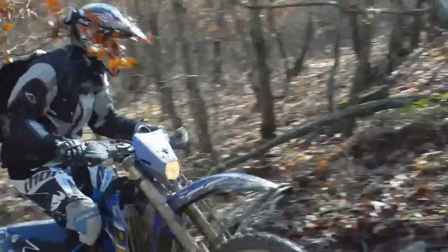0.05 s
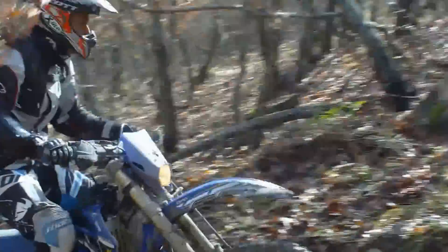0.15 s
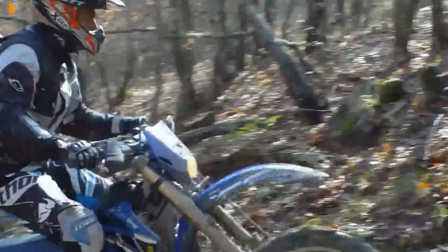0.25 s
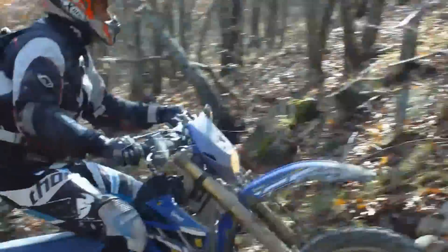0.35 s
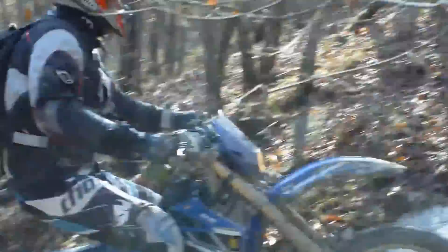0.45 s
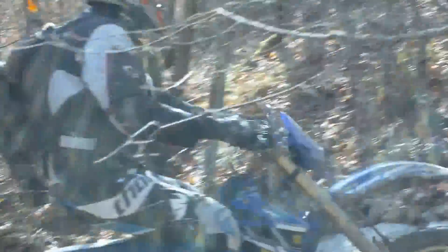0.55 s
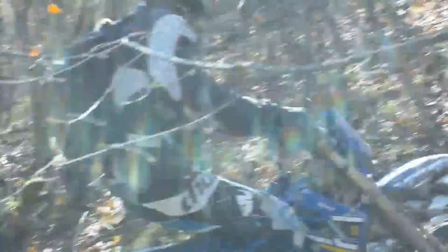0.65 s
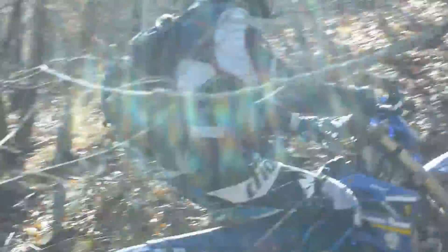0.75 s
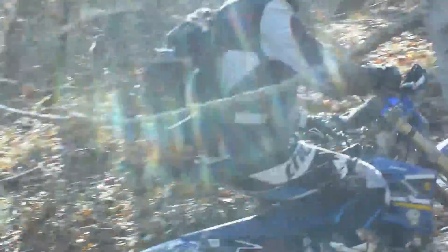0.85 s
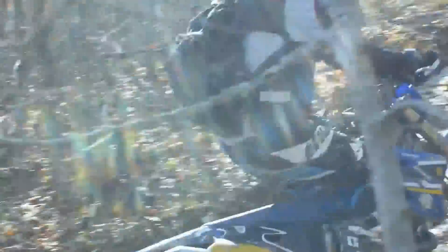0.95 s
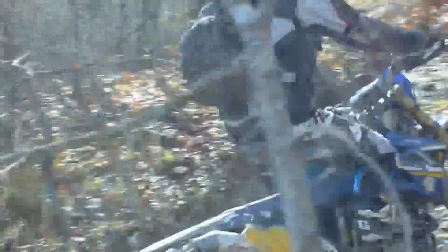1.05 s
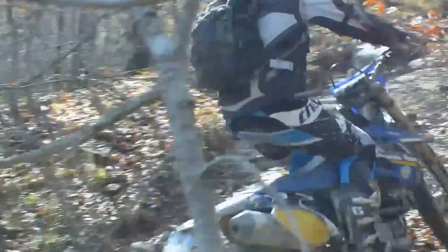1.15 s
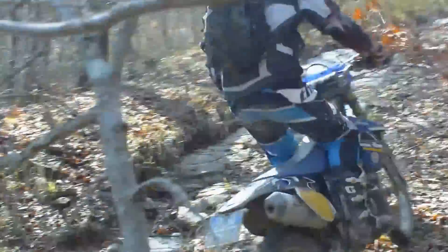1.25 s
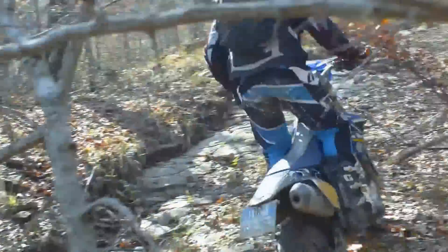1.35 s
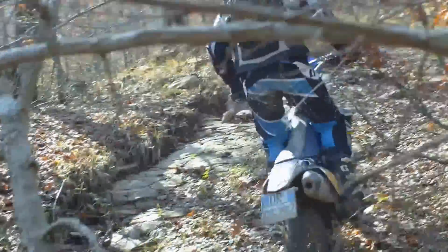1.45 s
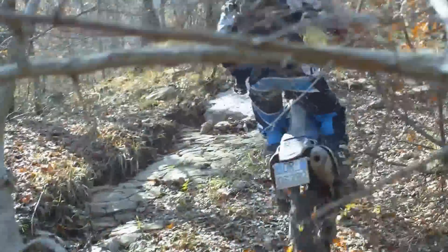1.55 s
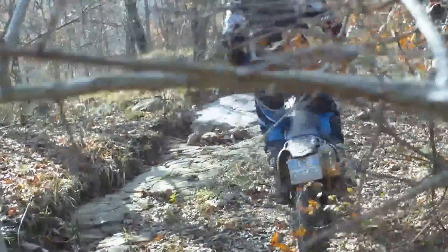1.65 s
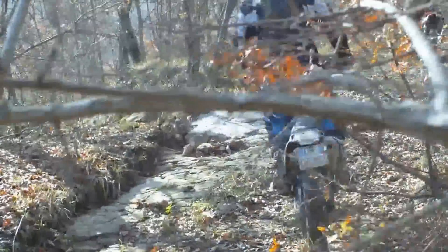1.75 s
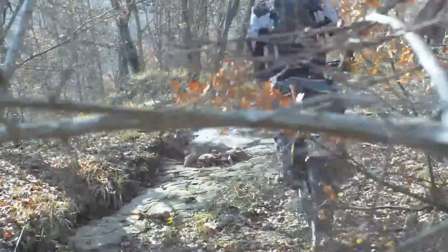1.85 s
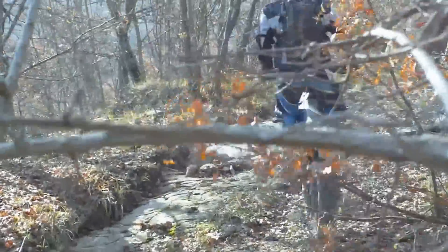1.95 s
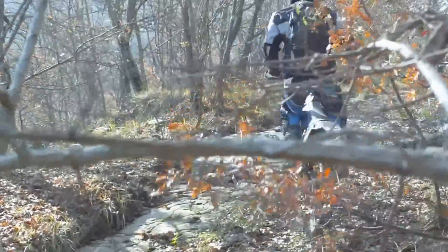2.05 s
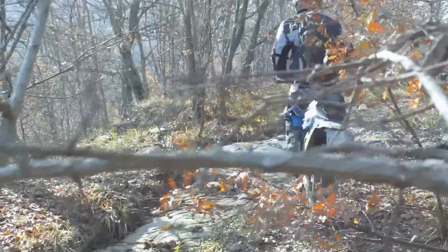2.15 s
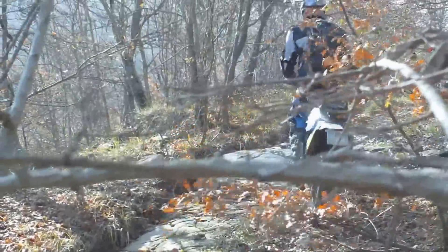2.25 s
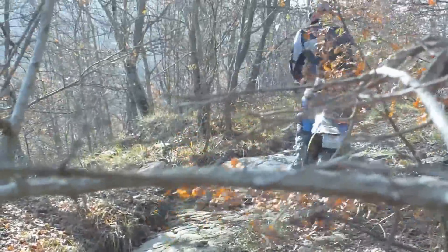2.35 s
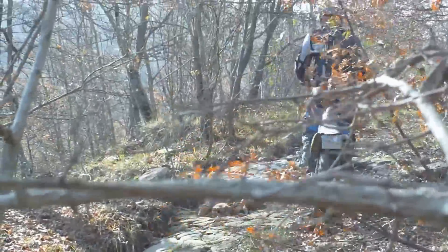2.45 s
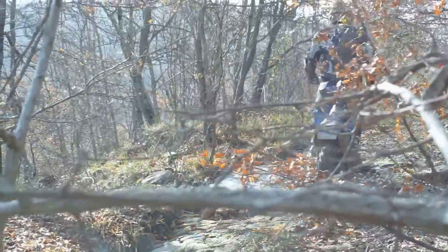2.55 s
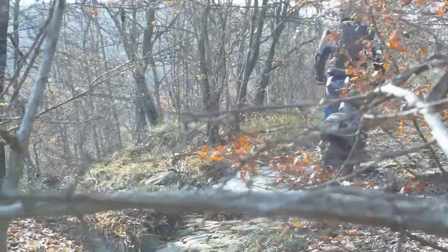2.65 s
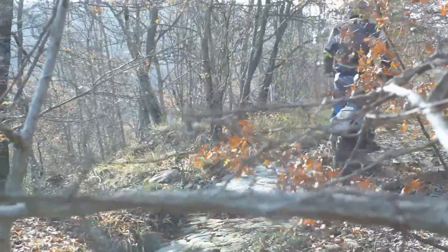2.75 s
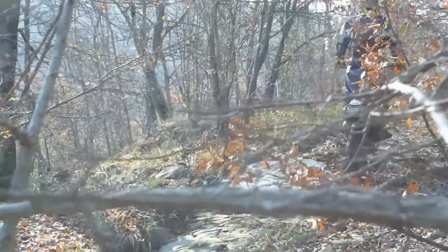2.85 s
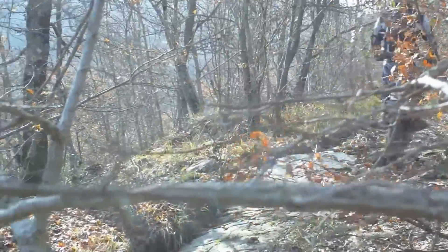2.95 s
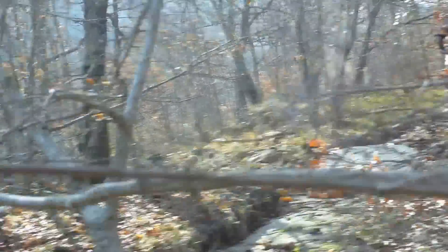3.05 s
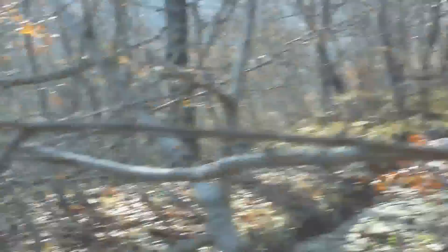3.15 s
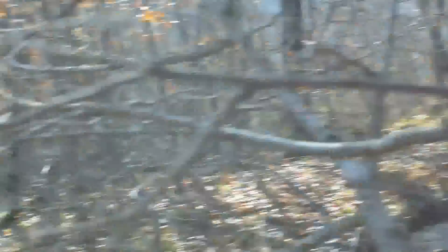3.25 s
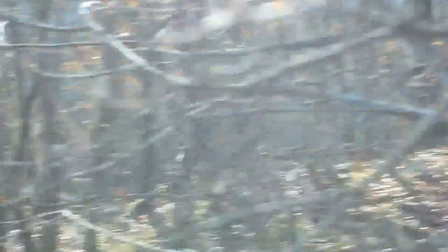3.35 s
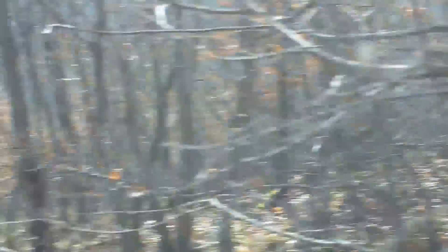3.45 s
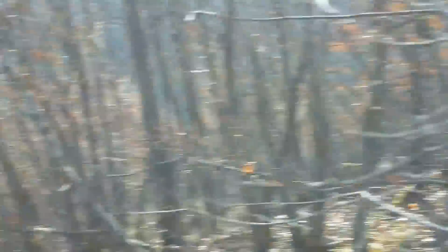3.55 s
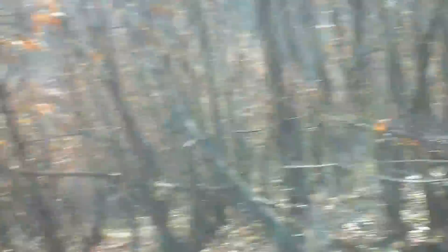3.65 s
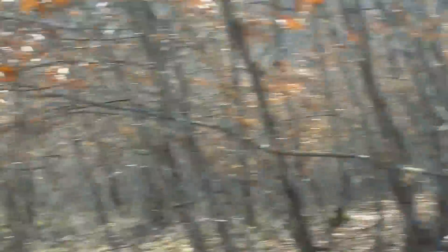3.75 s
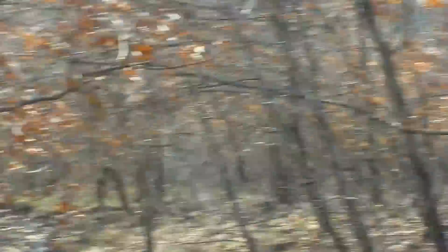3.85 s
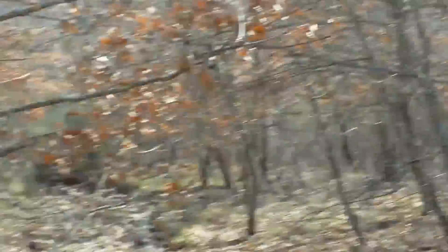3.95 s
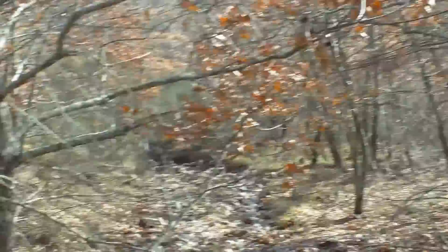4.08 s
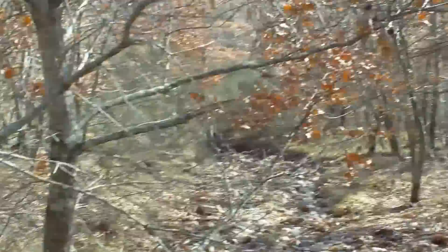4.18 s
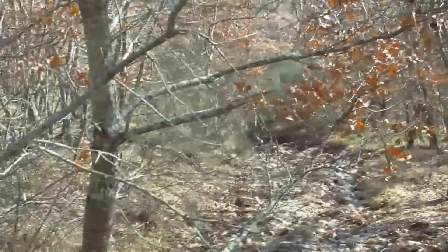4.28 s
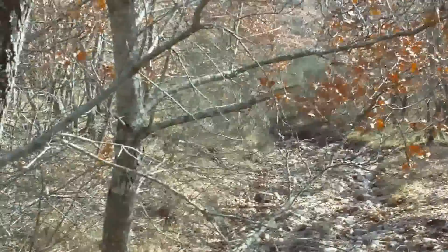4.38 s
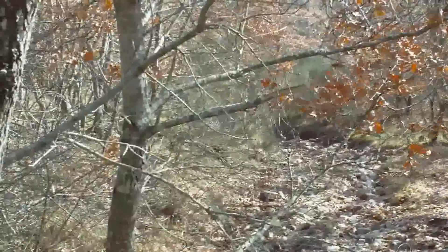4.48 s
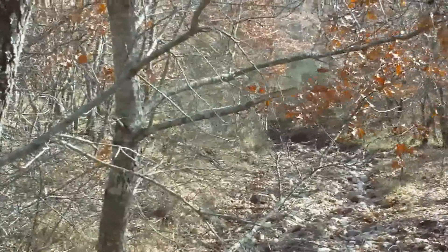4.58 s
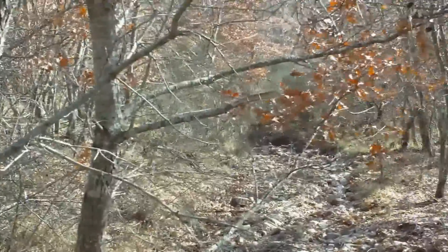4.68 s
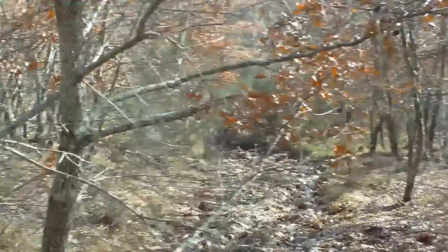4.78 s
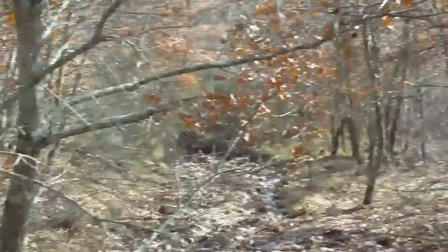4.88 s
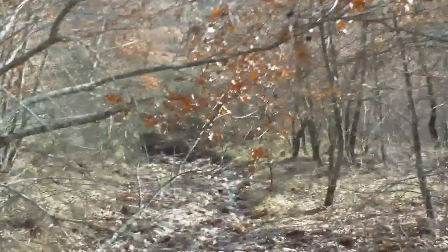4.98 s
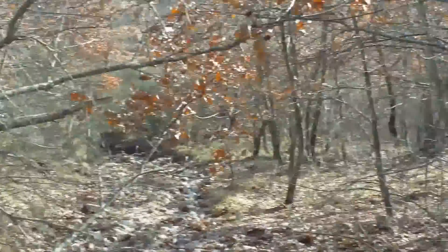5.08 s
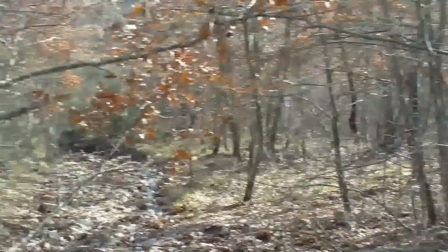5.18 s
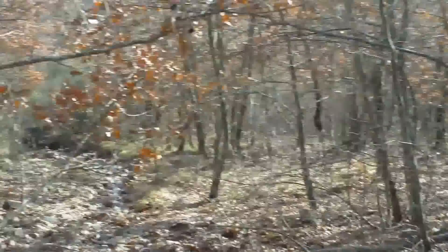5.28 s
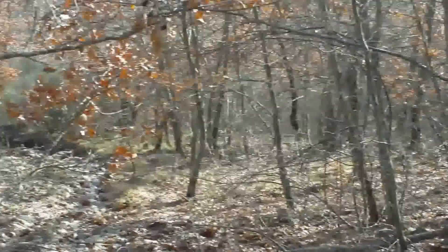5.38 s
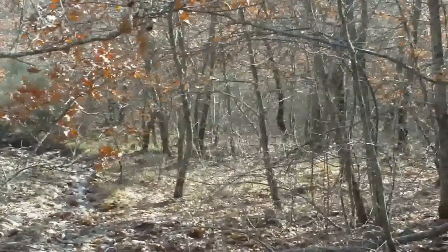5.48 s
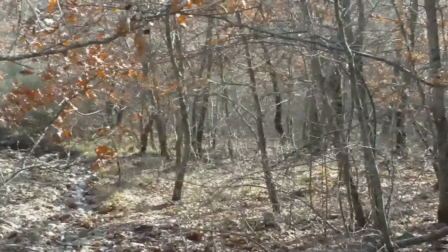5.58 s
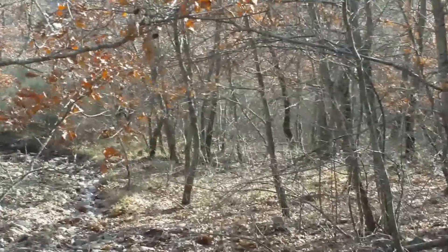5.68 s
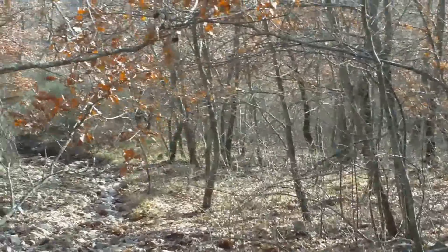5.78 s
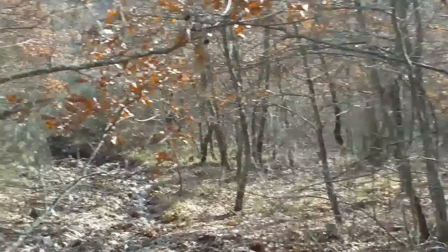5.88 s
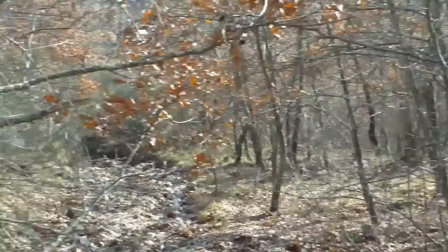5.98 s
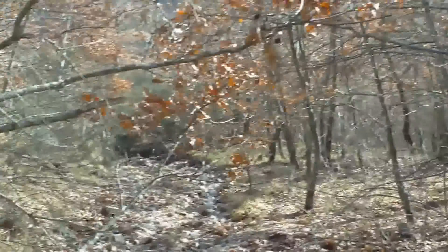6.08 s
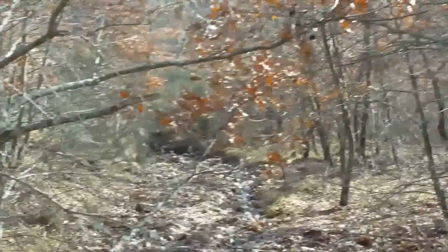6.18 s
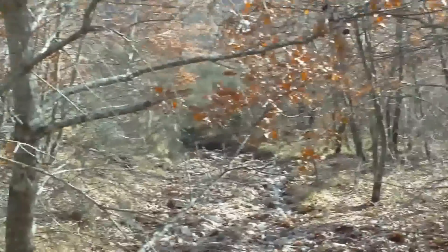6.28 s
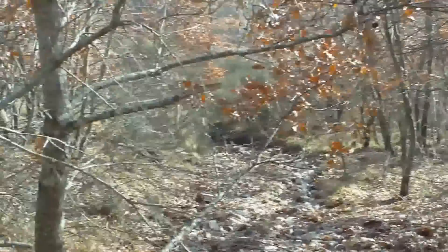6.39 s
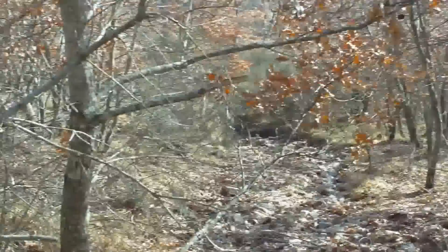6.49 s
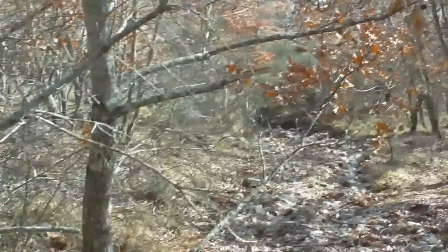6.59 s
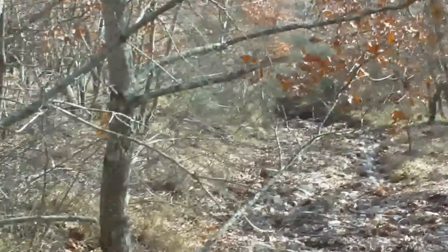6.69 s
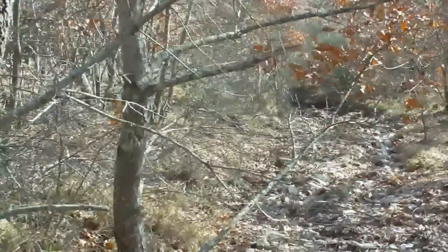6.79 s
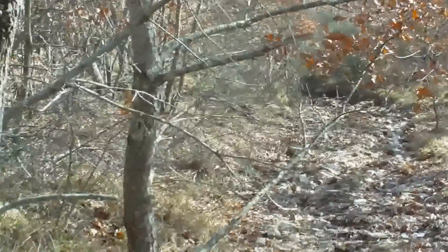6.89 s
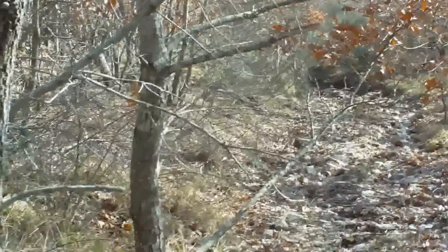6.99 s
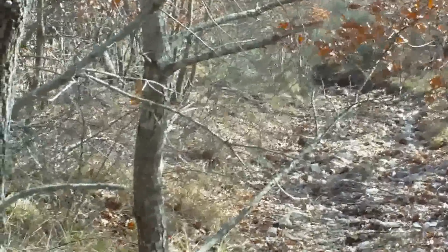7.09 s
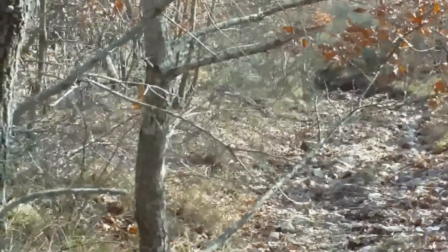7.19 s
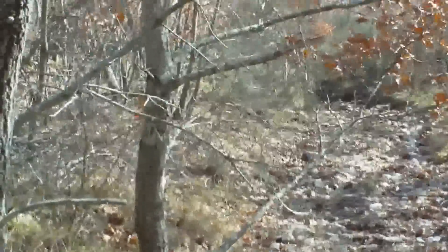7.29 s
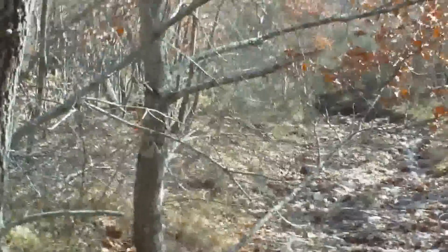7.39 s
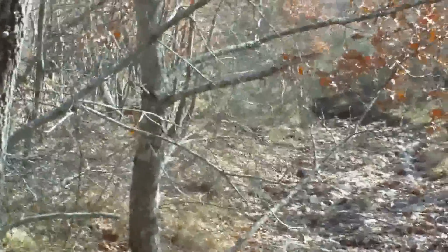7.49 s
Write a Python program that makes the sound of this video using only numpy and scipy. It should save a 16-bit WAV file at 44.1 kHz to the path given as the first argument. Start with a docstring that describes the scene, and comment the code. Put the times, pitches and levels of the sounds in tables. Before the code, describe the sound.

A four-stroke dirt bike passes very close in a leafless wood, its blunt, raspy exhaust revving hard over mechanical clatter. It rides away in uneven throttle bursts, dropping sharply after about three and a half seconds to a faint, slow idle. Near the small, dull-topped handheld microphone, dry leaves crackle, twigs tick and one loud knock lands near the end.

```python
"""A single-cylinder four-stroke trail bike rides past in a leafless wood, climbs away in bursts of throttle
and idles far off; near the microphone twigs snap and dry leaves rustle.
Every firing is a blunt pulse and a puff of turbulent gas ringing the exhaust, over steady clatter.
Trunks scatter the bike's sound as a noise tail; leaves are crackles on hiss, snaps are short rung bursts."""
import sys
import numpy as np
from scipy import signal
from scipy.fft import rfft, irfft, next_fast_len
from scipy.io import wavfile
from scipy.ndimage import uniform_filter1d

SR = 44100
rng = np.random.default_rng(int(sys.argv[2]) if len(sys.argv) > 2 else 0)


def digitize_waveform(pressure):
    """Quantize a signal to 16-bit integers and store it at the path in sys.argv[1].

    Rows of a 2-D input are taken as channels; values are limited to [-1, 1].
    """
    field = np.atleast_2d(pressure).T
    bounded = np.clip(field, -1, 1)
    quanta = np.round(bounded * 32767).astype(np.int16)
    wavfile.write(sys.argv[1], SR, quanta)


N = 332073

PULSE_SAMPLES = 4096
HZ = np.arange(PULSE_SAMPLES // 2 + 1) * SR / PULSE_SAMPLES + 1e-3   # offset avoids division by zero
PIPE_ECHO_S = .0092   # the pulse runs back up the pipe and leaves again

# exhaust resonances: (centre [Hz], width [Hz], level [dB])
RASP_MODES = [(1982, 155, 11.2), (2450, 195, 5.1), (2980, 500, 0.37)]
HISS_MODES = [(3440, 580, -5.5), (4700, 630, -9.5), (5395, 420, -10), (6660, 960, -15)]


def amp(db):
    """Decibels to gain."""
    return 10 ** (np.asarray(db) / 20)


def rms_one(x):
    """Scaled to unit rms."""
    return x / np.sqrt(np.mean(x ** 2) + 1e-20)


def columns(rows, s):
    """Table columns interpolated at times s; the first column is time."""
    when, *cols = np.transpose(rows)
    return [np.interp(s, when, c) for c in cols]


def coloured(x, spectrum):
    """Shapes white input with rows (frequency [Hz], level [dB]); rms 1."""
    hz, db = np.transpose(spectrum)
    size = next_fast_len(N)
    log_hz = np.log(np.arange(size // 2 + 1) * SR / size + 1)
    gain = amp(np.interp(log_hz, np.log(hz), db))
    return rms_one(irfft(rfft(x, size) * gain, size)[:N])


def drift(knots_per_s):
    """Random wander: straight lines between normal knots of spread 1."""
    knots = rng.standard_normal(int(N / SR * 60) + 2)
    return np.interp(np.arange(N) / SR * min(knots_per_s, 60), np.arange(len(knots)), knots)


def resonance(hz, width_hz):
    """Causal band-pass response, one row per entry of hz."""
    hz = np.reshape(hz, (-1, 1))
    return 1 / (1 + 1j * (HZ ** 2 - hz ** 2) / (HZ * width_hz))


def modes(table, count, spread_db, shift=1):
    """Parallel resonances of alternating sign, slightly different for each pulse."""
    luck = rng.standard_normal((count, len(table), 2))
    detune = 1 + .03 * luck[:, :, 1]
    total = 0
    for k, (hz, width_hz, db) in enumerate(table):
        gain = amp(db + spread_db * luck[:, k, :1])
        total = total + (-1) ** k * gain * resonance(hz * shift * detune[:, k], width_hz)
    return total


def blasts(count, rough, rise_s, fall_s):
    """Spectra of gas pulses: a sharp front plus a puff of turbulence that swells and dies."""
    s = np.arange(PULSE_SAMPLES) / SR
    gate = (1 - np.exp(-s / rise_s)) * np.exp(-(s / fall_s) ** 2)
    puff = rng.standard_normal((count, PULSE_SAMPLES)) * gate / np.linalg.norm(gate)
    rough = np.clip(rough, 0, 1)   # the puff's share of the energy
    front = np.exp(-2j * np.pi * HZ * rise_s)
    return np.sqrt(1 - rough) * front + np.sqrt(rough) * rfft(puff)


def lay(spectra, s, gain, peak=False):
    """Pulses scaled to unit energy (or unit peak), then by gain, placed at times s."""
    pulses = irfft(spectra, PULSE_SAMPLES)
    size = np.abs(pulses).max(axis=1) if peak else np.linalg.norm(pulses, axis=1)
    half = PULSE_SAMPLES // 2
    starts = np.round(np.asarray(s) * SR).astype(int) + half
    out = np.zeros(N + 2 * PULSE_SAMPLES)
    for pulse, start, g in zip(pulses, starts, gain / size):
        out[start:start + PULSE_SAMPLES] += g * pulse
    return out[half:half + N]


def through(response):
    """Steady noise heard through the mean magnitude of a response; rms 1."""
    db = 20 * np.log10(np.abs(response).mean(axis=0) + 1e-9)
    return coloured(rng.standard_normal(N), np.c_[HZ, db])


def air():
    """Steady background noise with a fixed spectrum."""
    # (frequency [Hz], level before scaling to rms 1 [dB])
    air_spectrum = [(12, -56.5), (25, -18), (138, 4), (330, 1.5), (560, 8), (900, 3.5), (1680, -22.5),
                    (2680, -31), (6700, -19), (7400, -37.5), (9620, -51.5)]
    return amp(-55) * coloured(rng.standard_normal(N), air_spectrum)


def crank(t):
    """Integrates crank speed to a cycle count; one firing per whole cycle."""
    # (time [s], rate [firings/s])
    firing_rate = [(0.0, 32.97), (0.15, 32.22), (0.27, 39.22), (0.5, 36.74), (0.6, 44.28), (0.72, 30.26),
                   (0.84, 31.11), (0.97, 25.53), (1.1, 31.88), (1.2, 32.1), (1.42, 32.82), (1.5, 40.69),
                   (1.62, 41.58), (1.7, 36.3), (1.82, 37.46), (1.92, 34.19), (2.1, 36.7), (2.2, 31.82),
                   (2.35, 25.17), (2.47, 27.85), (2.6, 32.37), (2.8, 33.49), (3.04, 30.88), (3.15, 33.28),
                   (3.35, 29.58), (3.6, 21.3), (3.78, 30.44), (3.9, 27.06), (4.05, 27.71), (4.19, 24.23),
                   (4.3, 30.46), (4.46, 29.93), (4.62, 35.09), (4.85, 20.86), (4.96, 23.37), (5.14, 18.24),
                   (5.3, 30.47), (5.4, 27.74), (5.53, 24.39), (5.7, 20.24), (5.9, 17.96), (6.1, 15.27),
                   (6.55, 14.83), (6.95, 15.19), (7.2, 13.43), (7.53, 18.35)]
    first_firing_cycles = .079
    blowdown_lead_s = .004   # the valve opens ahead of the loudest moment
    rate, = columns(firing_rate, t)
    cycle = np.cumsum(rate) / SR - first_firing_cycles
    count = int(cycle[-1]) + 1
    s = np.interp(np.arange(count), cycle, t) - blowdown_lead_s
    return cycle, s, np.interp(s, t, rate)


def throttle_and_pass(t):
    """Mean band levels, quick throttle swing, clatter offset and bark centre as the bike moves."""
    # throttle as heard: (time [s], bark [dB], boom [dB re mean bark])
    throttle = [(0.0, -25, -15.5), (0.11, -27, -14), (0.22, -22, -7.5), (0.44, -24, -3), (0.55, -24, -1.5),
                (0.62, -24, -9), (0.67, -24.5, -12), (0.74, -29, -8), (0.79, -27, 3.5), (0.85, -25, -9.5),
                (0.9, -29, -13), (0.97, -32, -15), (1.02, -27.5, -7), (1.1, -21, -8), (1.32, -20.5, -6),
                (1.43, -22.5, -2), (1.54, -22.5, -3.5), (1.65, -23.5, -4.5), (1.76, -17.5, -8.5),
                (2.09, -24.5, -5.5), (2.2, -30.5, -25), (2.42, -34, -13.5), (2.6, -25, -13),
                (2.75, -23.5, -16), (3.08, -27.5, -11.5), (3.3, -31.5, -7.5), (3.52, -46.5, -11),
                (3.65, -47.5, -1), (3.75, -27, -2.5), (3.85, -43, -4), (3.96, -43, 2), (4.2, -50.5, 4),
                (4.27, -54.5, 0), (4.42, -54, -3), (4.47, -49, 8), (4.54, -39, -7), (4.65, -47.5, -5),
                (4.84, -51, 1), (4.97, -54, -17), (5.12, -53, 0), (5.19, -39, -1.5), (5.39, -39.5, -3.5),
                (5.5, -49, -2.5), (5.7, -58, -6), (6.0, -65.5, 1), (6.3, -65.5, -1), (6.7, -63.5, 0.5),
                (7.0, -62.5, -13), (7.3, -60, -11)]
    # colour as the bike passes, turns its tailpipe and recedes:
    # (time [s], thump, upper bark, rasp, hiss [dB re mean bark], bark centre [Hz], clatter offset [dB])
    colour = [(0.0, -18.5, -2.5, -15, -20.5, 756.5, 5), (0.25, -17, -6, -15.5, -23.5, 809, 7),
              (0.45, -13.5, -1, -13.5, -22, 751, 4), (0.6, -24, -4, -12.5, -22, 783.5, 7.5),
              (0.95, -20, -3, -16, -24.5, 782.5, 10), (1.25, -20, -3.5, -10.5, -13, 888, -3.5),
              (1.6, -17.5, -4, -11.5, -15.5, 854.5, -6), (1.85, -18, -8, -12, -21, 698, -5.5),
              (2.1, -12.5, -4, -12.5, -21, 630.5, 1.5), (2.4, -11, -5, -14, -25, 778.5, 3),
              (2.65, -14, -5.5, -15, -24.5, 790.5, -0.5), (3.0, -16.5, -8, -14, -24.5, 811, -1),
              (3.35, -9.5, 1, -10, -19.5, 804.5, 1), (3.55, -15, -5, -13, -21.5, 953, 11.5),
              (3.75, -6.5, -3, -6, -18, 903.5, -1), (4.05, -3, -2, -3.5, -19, 850.5, 8.5),
              (4.35, -5.5, -8, -7.5, -22, 828, 14.5), (4.65, -6, 0.5, 0, -17.5, 904, 7.5),
              (5.0, -12, -6.5, -7.5, -16, 856.5, 7), (5.3, -8.5, -2.5, -2.5, -17.5, 837.5, 1),
              (5.65, -6.5, -6.5, -0.5, -15.5, 799.5, 10), (5.9, 1, 3.5, 5.5, -8, 783, 5.5),
              (6.2, 3, 4, 4.5, -5, 746.5, 7.5), (6.8, 2.5, -2, -2, -10, 745.5, 5.5),
              (7.3, -4, -2, -7, -14, 738, 9)]
    mean_over_s = .3
    bark_db, boom_db = columns(throttle, t)
    thump_db, upper_db, rasp_db, hiss_db, bark_hz, clatter_db = columns(colour, t)
    mean_db = uniform_filter1d(bark_db, size=int(mean_over_s * SR), mode="nearest")
    band_db = [mean_db + db for db in (thump_db, boom_db, 0, upper_db, rasp_db, hiss_db)]
    return band_db, bark_db - mean_db, clatter_db, bark_hz


def gas_pulses(count, overrun, late):
    """Low bands repeat almost cleanly; higher up turbulence takes over and a weak pipe echo follows."""
    echo = 1 + amp(-10) * late
    clean = blasts(count=count, rough=.03 + .35 * overrun[:, None], rise_s=.002, fall_s=.01)
    bark = blasts(count=count, rough=.55, rise_s=.003, fall_s=.007)
    upper = blasts(count=count, rough=.8, rise_s=.003, fall_s=.006) * echo
    rasp = blasts(count=count, rough=.97, rise_s=.003, fall_s=.008) * echo
    hiss = blasts(count=count, rough=1, rise_s=.003, fall_s=.012)
    return [clean, clean, bark, upper, rasp, hiss]


def exhaust_bands(s, bark_hz, late):
    """Pipe resonances in six bands; further resonances in series steepen the bands."""
    # low modes glide with heat and aspect: (time [s], thump [Hz], boom [Hz], third mode [dB re boom])
    low_modes = [(0, 156, 304, -1.5), (.15, 178.5, 320, 3.5), (.3, 207, 380, 8), (.47, 205, 370, 0.5),
                 (.6, 170, 383, -16.5), (.7, 144.7, 340, -3), (.8, 145.6, 317, -22), (.95, 142, 345, -4),
                 (1.05, 143, 309, -6.5), (1.15, 185, 373, -9), (1.4, 171.5, 367, -17),
                 (1.55, 189.4, 357, -5.5), (1.8, 177, 369, -4.5), (2.1, 180, 368, 0.5), (2.3, 150, 390, 6),
                 (2.45, 150, 319, 1), (2.6, 173, 330, 2.5), (2.8, 182, 347, -15), (3.05, 156, 319, -13.5),
                 (3.17, 179, 344, -8), (3.35, 160, 313, -10.5), (3.6, 133, 340, -10.5),
                 (3.76, 159.6, 341, -16), (4.0, 150, 334, -11.5), (4.2, 148, 360, -9.5),
                 (4.5, 163, 371, 0.5), (5.1, 139.4, 337, 3.5), (5.3, 157.3, 321, -5.5), (5.7, 142, 328, -2),
                 (7.3, 132.7, 293, 4.5)]
    # (centre before sliding [Hz], width [Hz], level [dB])
    upper_bark_modes = [(1100, 280, -3.5), (1750, 93, -15)]
    # slides as the tailpipe turns: (time [s], centre of the main upper bark mode [Hz])
    upper_bark_glide = [(0, 1217), (.36, 1095), (.5, 1143), (.66, 1400), (.9, 1242), (1.3, 1216),
                        (1.6, 1127), (2.0, 1153), (2.45, 1500), (2.9, 1310), (3.3, 1086), (3.75, 1257),
                        (4.2, 1100), (4.6, 1143), (5.3, 1090), (7.3, 1070)]
    # one rasp resonance stands out more or less as the tailpipe turns: (time [s], level [dB])
    rasp_peak = [(0, -2.5), (2, -28), (3.5, -37), (4.2, 1), (4.6, -26), (5.2, 4.5), (5.6, 14.5),
                 (6.25, 23.5)]
    count = len(s)

    thump_hz, boom_hz, third_db = columns(low_modes, s)
    thump = resonance(thump_hz, 92) ** 3 - amp(-19.0) * resonance(66, 27)
    third = amp(third_db)[:, None] * resonance(565, 90) * resonance(499, 140)
    boom = resonance(boom_hz, 85) * resonance(boom_hz, 100) * resonance(boom_hz, 220) - third

    # the returning bark is lower
    bark_echo = amp(-4.5) * late * resonance(.82 * bark_hz, 260) ** 2
    bark = resonance(bark_hz, 380) * resonance(bark_hz, 490) - amp(-11.5) * resonance(592, 160) + bark_echo
    bark = bark * resonance(780, 650)

    shift = columns(upper_bark_glide, s)[0] / upper_bark_modes[0][0]
    upper = modes(upper_bark_modes, count=count, spread_db=3.5, shift=shift) * resonance(1350, 900)

    peak = 1 + amp(columns(rasp_peak, s)[0])[:, None] * resonance(2810, 480)
    rasp = modes(RASP_MODES, count=count, spread_db=2.1) * resonance(2450, 1400) * peak
    hiss = modes(HISS_MODES, count=count, spread_db=2.5) * resonance(5490, 3400)
    return [thump, boom, bark, upper, rasp, hiss]


def engine():
    """One blast per firing through the exhaust, over steady clatter in the same colours; low and upper part."""
    # share of the throttle's quick swing followed by: thump, boom, bark, upper bark, rasp, hiss pulses [ratio]
    pulse_follows = [0.58, 0.97, 1.0, 0.86, 0.67, 1]
    # steady part of rasp and hiss: (time [s], clatter level before the band's own offset [dB])
    treble_clatter = [(0, 1), (1.0, 1), (1.25, -4), (1.9, -3), (2.4, 1), (3.3, 2), (3.7, -2), (4.6, -3),
                      (5.2, -4), (5.7, -7), (6.3, -7), (7.3, -3)]
    clatter_sag_db, clatter_flicker_db = 6, 1.5
    idle_rate, pull_rate = 16, 24   # firings/s
    overrun_db = 6   # swing below the mean at which firings are most uneven
    even_spread_db, added_spread_db = 1.0, 2.0
    thump_lead_s, idle_puff_lead_s, idle_puff_db = .004, .019, -2

    t = np.arange(N) / SR
    cycle, s, rate = crank(t)
    count = len(s)
    band_db, swing_db, clatter_db, bark_hz = throttle_and_pass(t)
    pulse_db = [np.interp(s, t, db + share * swing_db) for db, share in zip(band_db, pulse_follows)]
    # clatter is loudest at the start of each cycle and sinks until the next
    sag_db = clatter_sag_db * (cycle % 1 - .5)
    steady_db = [db + swing_db - sag_db for db in band_db]

    # combustion varies most on a closed throttle or towards idle speed
    idle = np.interp(rate, [idle_rate, pull_rate], [1, 0])
    overrun = np.clip(-np.interp(s, t, swing_db) / overrun_db, 0, 1)
    overrun = np.maximum(overrun, idle)
    uneven_db = (even_spread_db + added_spread_db * overrun) * rng.standard_normal(count)
    gain = np.sqrt(SR / rate) * amp(uneven_db)   # a pulse carries the energy of one whole cycle

    echo_s = PIPE_ECHO_S * (1 + .06 * rng.standard_normal((count, 1)))
    late = np.exp(-2j * np.pi * HZ * echo_s)
    sources = gas_pulses(count, overrun, late)
    responses = exhaust_bands(s, np.interp(s, t, bark_hz), late)
    leads_s = [thump_lead_s, 0, 0, 0, 0, 0]
    treble_db, = columns(treble_clatter, t)
    offsets_db = [-12, -11, -7, -2, 2 + treble_db, 9 + treble_db]

    layers = []
    for source, response, lead_s, db, held_db, offset_db in zip(
            sources, responses, leads_s, pulse_db, steady_db, offsets_db):
        pulses = lay(source * response, s - lead_s, gain * amp(db))
        level_db = held_db + clatter_db + offset_db + clatter_flicker_db * drift(40)
        layers.append(pulses + amp(level_db) * through(response))

    # at idle a soft rasp runs ahead of each firing
    puff = blasts(count=count, rough=1, rise_s=.002, fall_s=.012) * responses[4]
    layers.append(lay(puff, s - idle_puff_lead_s, idle * gain * amp(pulse_db[4] + idle_puff_db)))
    return sum(layers[:2]), sum(layers[2:])


def cracks():
    """Harder exhaust blasts, mostly sharp front, with a ringing body, boom and bright edge."""
    # (time [s], peak [dB], brightness [dB], centre [Hz], boom [dB])
    hard_firings = [(0.237, -11.5, -30, 770, -18), (0.265, -3, -32, 800, -14),
                    (0.342, -3.5, -29, 1130, -28), (0.395, -4.5, -26, 1150, -18),
                    (0.846, -15, -32.5, 910, -17.5), (1.053, 1.5, -27, 810, -12),
                    (1.166, -4.5, -16.5, 1250, -21), (1.237, -5.5, -22, 1250, -1.5),
                    (1.271, 0, -26, 1290, -13.5), (1.304, -10, -36, 900, -15), (1.333, -6, -36, 1260, -9),
                    (1.479, -6, -33, 780, -20), (1.504, -5, -31, 880, -9), (1.53, -10, -28, 900, -4),
                    (1.555, 2, -39, 1240, -19), (1.577, -8, -12, 1090, 2), (1.602, -11, -36, 1000, -10),
                    (1.837, -9.5, -43, 860, -17), (2.469, -6.5, -25.5, 1450, -9.5),
                    (2.502, -9, -35, 800, -26), (2.629, -12, -28, 795, -14), (2.66, -9, -23.5, 770, -16),
                    (3.062, -4, -48, 870, -42), (3.449, -12, -46, 1150, -21), (3.669, -17.5, -32, 1020, -6),
                    (3.707, -14, -32, 1080, -9), (3.741, -8, -13.5, 1360, -12), (3.772, -10, -31, 1350, -5),
                    (3.986, -18.5, -20, 1330, -7.5), (4.49, -2.5, -20, 1130, -5),
                    (4.519, -2, -17, 1150, -1.5), (4.552, -29, -22, 1000, 0), (4.579, -30, -31, 1050, -11),
                    (4.605, -16, -36, 1160, -18), (4.635, -21, -22, 1110, -10),
                    (4.666, -28.5, -25, 1100, 4), (4.7, -25.5, -11, 1150, -18), (4.736, -24, -21, 1150, -2),
                    (4.774, -28, -22, 1100, -10), (4.814, -25, -27, 1150, -18), (4.857, -31, -17, 1100, -6),
                    (5.193, -13.5, -10, 972, 3.5), (5.233, -17.5, -49, 850, -5),
                    (5.404, -22.5, -40, 770, -2)]
    # (centre [Hz], width [Hz])
    boom_mode = (395, 200)
    s, peak_db, bright_db, hz, boom_db = np.transpose(hard_firings)
    echo = 1 + amp(-9) * np.exp(-2j * np.pi * HZ * PIPE_ECHO_S)
    boom = resonance(*boom_mode) * resonance(420, 500) * echo
    body = resonance(hz, 240) * resonance(hz, 1200) - amp(boom_db)[:, None] * boom
    edge = modes(RASP_MODES + HISS_MODES, count=len(s), spread_db=2.5) * amp(bright_db)[:, None]
    blast = blasts(count=len(s), rough=.3, rise_s=.001, fall_s=.004)
    return lay(blast * (body + edge), s, amp(peak_db), peak=True)


def wood(x):
    """Scatter from many trunks: a dull, dying noise response that builds up after the direct sound."""
    t60_s, build_s, level_db = 0.31, 0.029, -16
    s = np.arange(SR // 2) / SR
    tail = rng.standard_normal(len(s)) * amp(-60 * s / t60_s) * (1 - np.exp(-(s / build_s) ** 2))
    tail = signal.lfilter([1], [1, -.6], tail)
    return amp(level_db) * signal.fftconvolve(x, tail / np.linalg.norm(tail))[:N]


def snaps():
    """Twigs and stones: a broad crack and one short woody ring."""
    # (time [s], peak [dB], centre [Hz], width [Hz], crack [dB])
    snap_events = [(2.71, -9, 4500, 800, -2), (2.803, -14, 4130, 805, -7.5), (3.221, -14, 4520, 800, -6),
                   (4.152, -20, 2530, 400, -7), (5.805, -39, 2700, 500, -20), (6.097, -37, 2800, 500, -20),
                   (6.157, -30, 5500, 700, -10), (6.221, -28.5, 6400, 900, -9),
                   (6.596, -12, 1480, 1500, -2), (6.934, -21.5, 5840, 400, -8),
                   (6.951, -37, 5000, 1500, -12), (7.058, -17.5, 1870, 400, -10),
                   (7.092, -24.5, 770, 400, -47), (7.169, 4, 885, 460, -9)]
    s, peak_db, hz, width_hz, crack_db = np.transpose(snap_events)
    ring = resonance(hz, width_hz[:, None]) * resonance(hz, 3 * width_hz[:, None])
    crack = amp(crack_db)[:, None] * resonance(6500, 19000)
    burst = blasts(count=len(s), rough=0.64, rise_s=0.00034, fall_s=0.0038)
    return lay(burst * (ring + crack), s, amp(peak_db), peak=True)


def leaves():
    """Dense tiny crackles of uneven size on a hiss; each rustle swells, holds and sinks."""
    # (start [s], rise [s], hold [s], fall [s], low gain [dB], treble gain [dB])
    rustles = [(6.105, 0.48, 0.075, 0.03, -45, -45), (6.6, .05, .04, .07, -55, -58),
               (7.042, 0.06, 0.029, .08, -34, -50.5), (7.129, 0.079, 0.099, 0.057, -41.5, -39),
               (7.339, 0.1, 0.05, .1, -39, -39.5), (7.447, 0.047, 0.005, 0.024, -28.5, -30.5)]
    # (frequency [Hz], density before scaling to rms 1 [dB per Hz])
    leaf_spectrum = [(150, -31.5), (450, -3.5), (800, 2), (1500, 4), (2800, -1.5), (4500, -2.5),
                     (6000, 0.5), (7300, -6.5)]
    depth_db = 25   # each swells from and sinks to this far below its top
    grains_per_s, split_hz = 1800, 2200
    t = np.arange(N) / SR
    low_gain, treble_gain = np.zeros((2, N))
    for start, rise, hold, fall, low_db, treble_db in rustles:
        shape = np.interp(t, start + np.cumsum([0, rise, hold, fall]), [0, 1, 1, 0])
        swell = (shape > 0) * amp(-depth_db * (1 - shape) ** 2)
        low_gain = np.hypot(low_gain, amp(low_db) * swell)
        treble_gain = np.hypot(treble_gain, amp(treble_db) * swell)
    hits = rng.random(N) < grains_per_s / SR
    grains = hits * amp(3.1 * np.minimum(rng.exponential(1, N), 4)) * rng.choice([-1, 1], N)
    rustle = coloured(rms_one(grains) + 0.9 * rng.standard_normal(N), leaf_spectrum)
    low = signal.sosfilt(signal.butter(2, split_hz, fs=SR, output="sos"), rustle)
    high = signal.sosfilt(signal.butter(2, split_hz, "high", fs=SR, output="sos"), rustle)
    # opposite signs join the halves without a gap
    return amp(0.73 * drift(45)) * (low_gain * low - treble_gain * high)


def scene():
    """The bike with its scatter, the near small sounds and the air."""
    low, upper = engine()
    sharp = cracks()
    # trunks are too thin to throw back the bass; cracks stir the wood less than the bark
    scatter = wood(upper + amp(-7) * sharp)
    return (low + upper + sharp + scatter + snaps() + leaves() + air())[None]


def record(dry):
    """A small microphone: weak in the deep bass, the highest peaks are rounded, the top is cut steeply."""
    thin = signal.sosfilt(signal.butter(1, 110, "high", fs=SR, output="sos"), dry)
    rounded = .9 * np.tanh(thin / .9)
    return signal.sosfilt(signal.cheby1(12, .5, 7150, fs=SR, output="sos"), rounded)


dry = scene()
out = record(dry)
digitize_waveform(out)
```